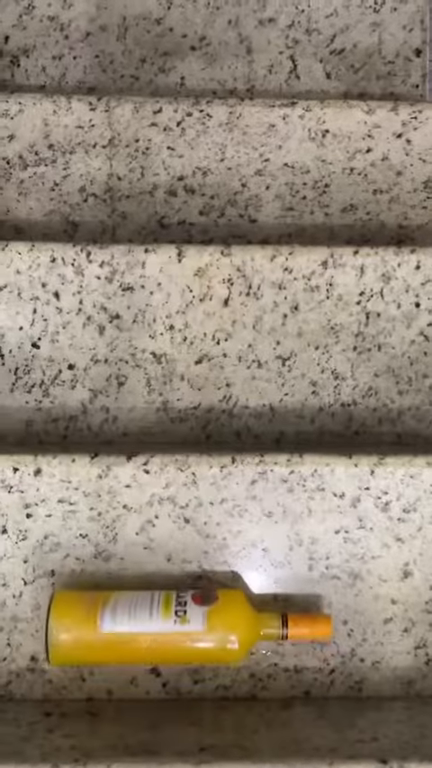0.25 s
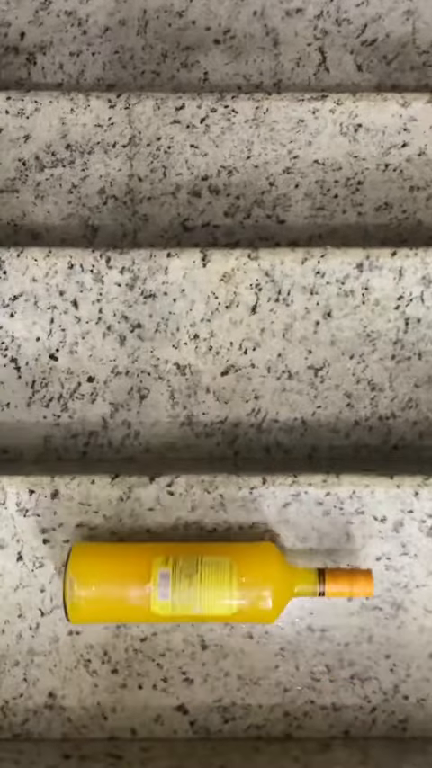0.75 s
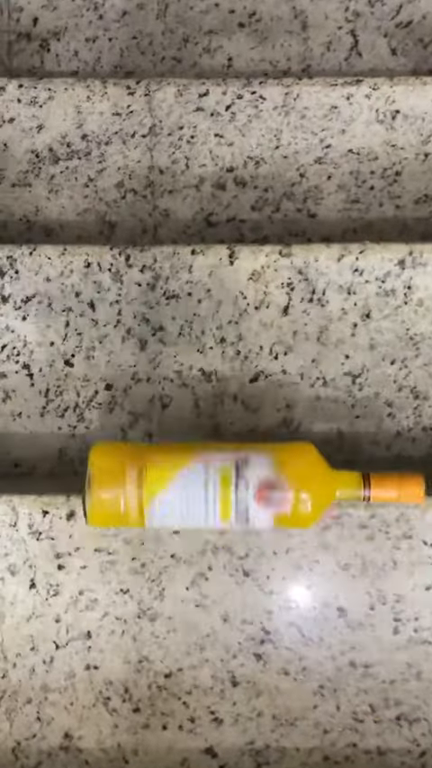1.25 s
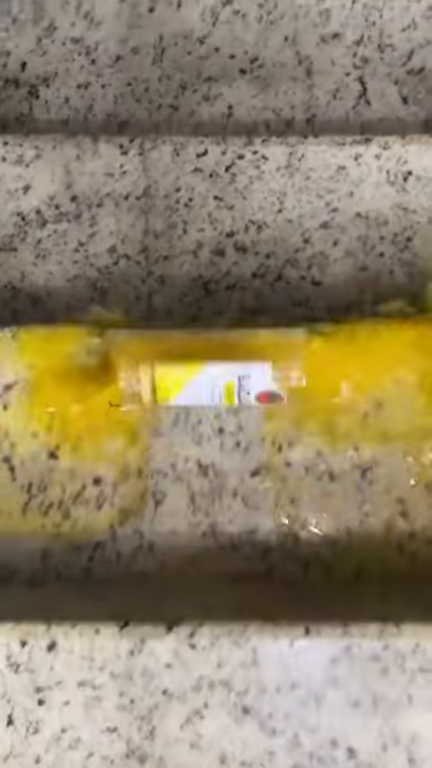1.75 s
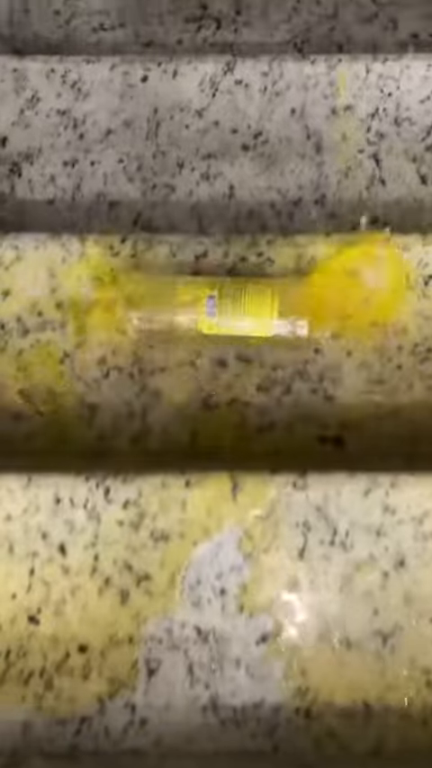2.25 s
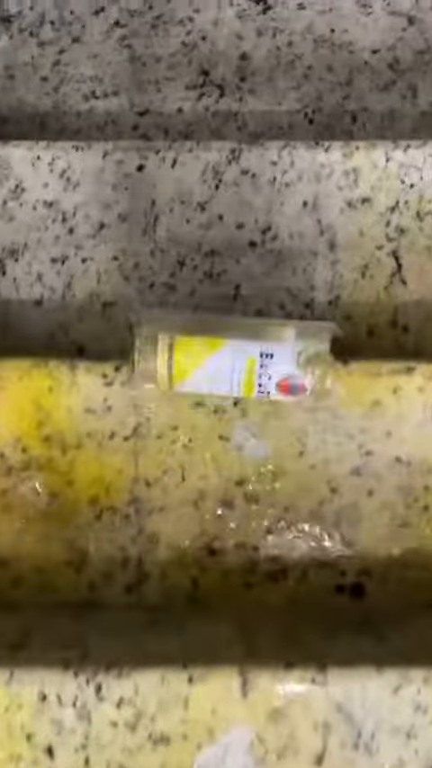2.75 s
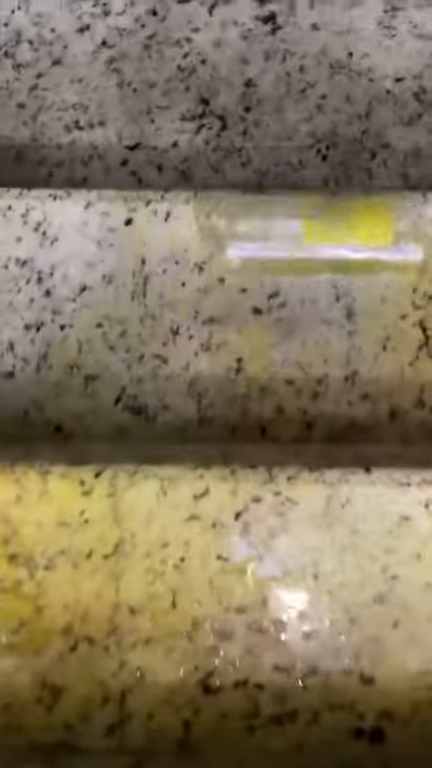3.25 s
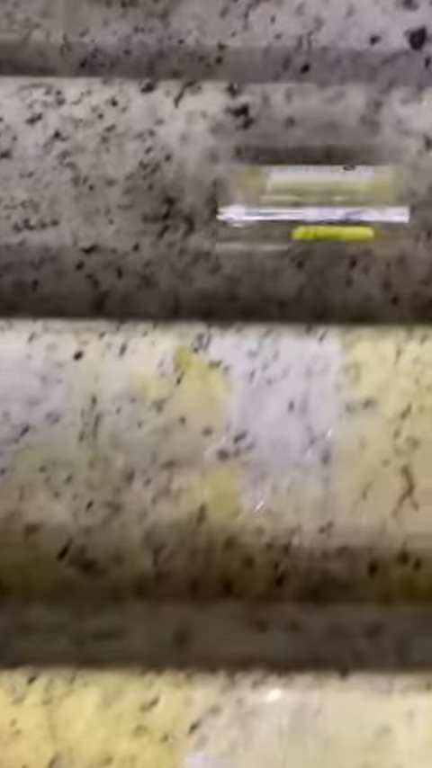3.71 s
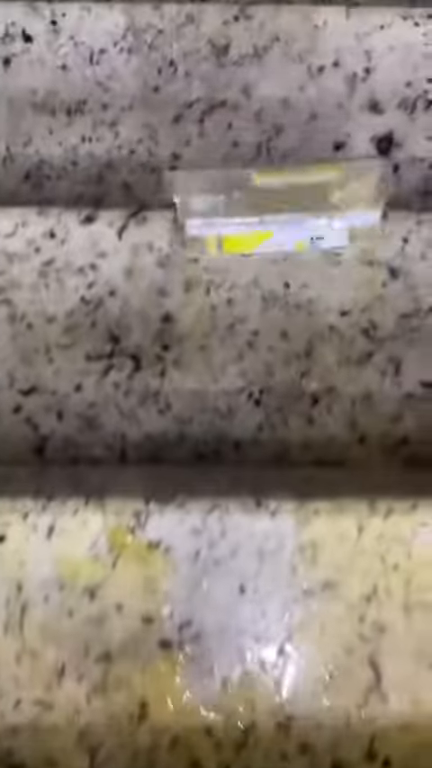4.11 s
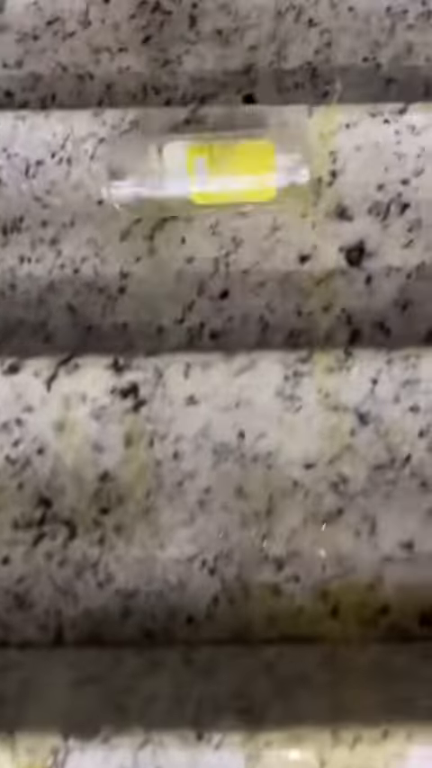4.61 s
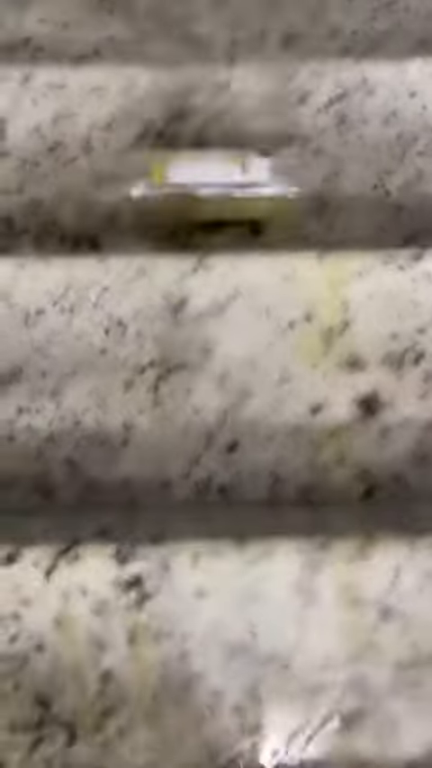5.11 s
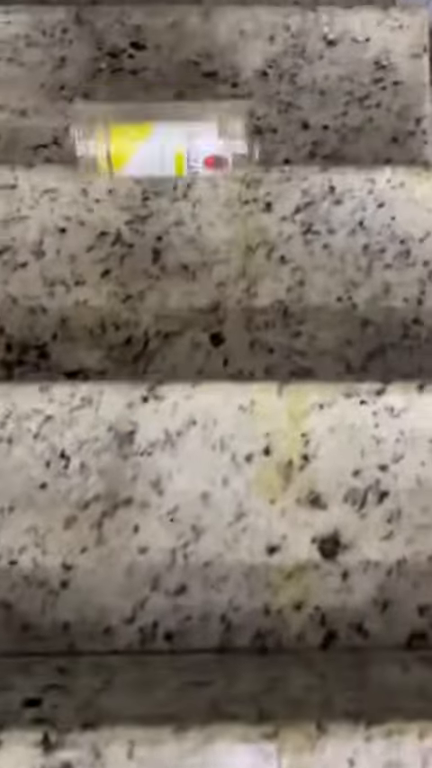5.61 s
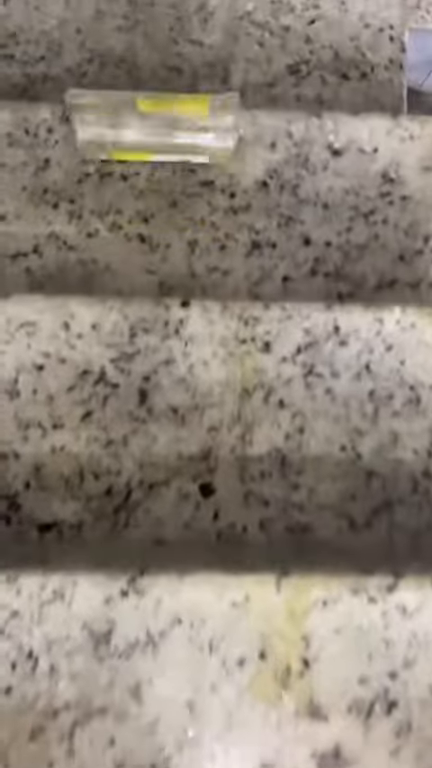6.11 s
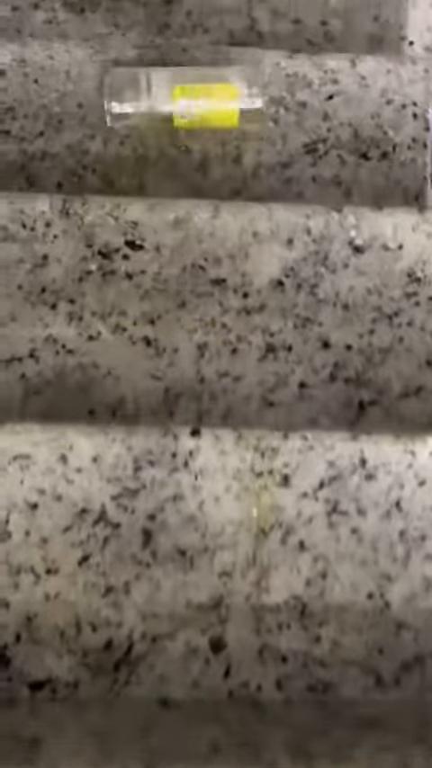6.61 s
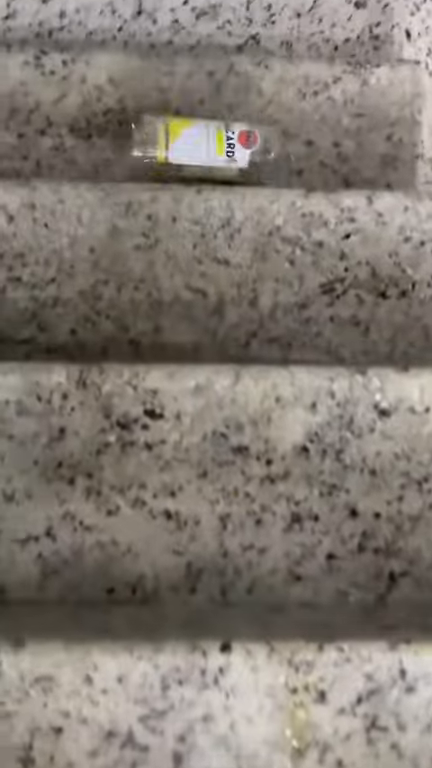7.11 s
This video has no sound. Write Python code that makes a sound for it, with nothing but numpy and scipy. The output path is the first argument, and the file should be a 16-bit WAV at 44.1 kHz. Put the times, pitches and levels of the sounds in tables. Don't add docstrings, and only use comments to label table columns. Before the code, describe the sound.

A full glass bottle rolls softly on stone stairs, bursts with a wet crack and splash, then its hollow shell clacks down step after step, echoing.

```python
import sys
import numpy as np
from scipy import signal
from scipy.fft import rfft, irfft
from scipy.io import wavfile
from scipy.ndimage import uniform_filter1d

SR = 44100
rng = np.random.default_rng(int(sys.argv[2]) if len(sys.argv) > 2 else 0)


def gain_from_decibels(decibels):
    exponent = np.asarray(decibels, float) / 20
    return 10 ** exponent


def unload_wav(signal):
    wavfile.write(
        sys.argv[1],
        SR,
        np.round(np.clip(np.atleast_2d(signal).T, -1, 1) * 32767).astype(np.int16),
    )


N = 324557


def evened(x):
    return x / np.sqrt(np.mean(x ** 2) + 1e-20)


def read(points, hz):
    point_hz, value = np.transpose(points)
    return np.interp(np.log(hz + 1), np.log(point_hz + 1), value)


def add(mix, start_s, sound):
    part = mix[round(start_s * SR):][:len(sound)]
    part += sound[:len(part)]


def coloured(x, points, tilt_db=0.):
    hz = np.fft.rfftfreq(len(x), 1 / SR)
    gain = gain_from_decibels(read(points, hz) + tilt_db * np.log2((hz + 50) / 2000))
    return evened(irfft(rfft(x) * gain, len(x)))


def resonate(x, hz, width_hz):
    turn = np.exp(2j * np.pi * np.cumsum(hz * np.ones(len(x))) / SR)
    r = np.exp(-np.pi * width_hz / SR)
    return 2 * (turn * signal.lfilter([1 - r], [1, -r], x / turn)).real


def drone(hz, width_hz, size=N):
    x = rng.standard_normal(size)
    for _ in range(2):
        x = resonate(x, hz, width_hz)
    return evened(x / np.sqrt(uniform_filter1d(evened(x) ** 2, size=3000) + 0.11))


def ring(hz, t60_s, rise_s=0.00045):
    t = np.arange(SR // 4) / SR
    return gain_from_decibels(-60 * t / t60_s) * (1 - np.exp(-t / rise_s)) * np.sin(2 * np.pi * hz * t)


# pitch_hz, level_db
STILL_AIR = [(76, -42.5), (130, -13.5), (178, -4.5), (308, -14.5), (428, -10.5), (665, -21), (1600, -21),
             (1820, -25), (7340, -34), (10400, -46.5), (13500, -85), (22000, -120)]
AIR_DB, AIR_DRIFT_DB_PER_S = -68, -0.57
AIR_EARLY_DB, AIR_SETTLES_S = 7, 0.38
# start_s, end_s, pitch_hz, level_db
LINGERING_TONES = [(1.22, 2.15, 172, -47), (1.22, 2.0, 228, -58), (.41, .56, 462, -58),
                   (.93, 1.0, 365, -55), (0, .15, 1393, -62), (0, .19, 1720, -64), (.2, .9, 100, -56),
                   (.05, .38, 55, -57), (3.45, 3.75, 460, -55), (.8, 1.2, 760, -65)]
# start_s, boom_db, swell_db, swell_lag_s, swell_hz
THUDS_IN_FLIGHT = [
    (1.22, -56.5, -40.5, 0.34, 73),
    (1.84, -35, -55, .2, 65),
    (2.75, -39.5, -40, 0.28, 70),
    (3.44, -34.5, -42.5, 0.23, 62),
    (4.15, -41.5, -52, 0.31, 55),
    (4.89, -43, -54.5, 0.28, 55),
    (5.58, -39.5, -50, 0.28, 55),
    (6.23, -41.5, -50, 0.29, 55),
    (6.94, -40, -50, 0.27, 55),
]
BOOM_RISE_S, BOOM_T60_S, SWELL_S = .05, 0.94, 0.11
DEEP_REST_DB, UPPER_REST_DB, SUB_DB = -58.5, -66, -64


def building():
    t = np.arange(N) / SR
    deep, upper = gain_from_decibels(DEEP_REST_DB), gain_from_decibels(UPPER_REST_DB)
    for s, boom_db, swell_db, lag_s, _ in THUDS_IN_FLIGHT:
        since = np.maximum(t - s, 0)
        upper = upper + gain_from_decibels(boom_db - 60 * since / BOOM_T60_S) * (1 - np.exp(-since / BOOM_RISE_S))
        deep = deep + gain_from_decibels(swell_db) * np.exp(-.5 * ((t - s - lag_s) / SWELL_S) ** 2)
    swell_s = [row[0] + row[3] for row in THUDS_IN_FLIGHT]
    deep_hz = np.interp(t, swell_s, [row[4] for row in THUDS_IN_FLIGHT])
    out = deep * drone(deep_hz, 23) + upper * drone(108.2, 30) + gain_from_decibels(SUB_DB) * drone(38, 15)

    still = coloured(rng.standard_normal(N), STILL_AIR)
    early = coloured(rng.standard_normal(N), STILL_AIR, tilt_db=1.5)
    air = gain_from_decibels(AIR_DRIFT_DB_PER_S * t) * still + gain_from_decibels(AIR_EARLY_DB) * np.exp(-t / AIR_SETTLES_S) * early
    out += gain_from_decibels(AIR_DB + 7) * air

    for start, end, hz, db in LINGERING_TONES:
        size = round((end - start) * SR)
        tone = drone(hz, 8.3, size=SR)[:size]
        add(out, start, gain_from_decibels(db) * tone * signal.windows.tukey(size, .5))
    return out


# pitch_hz, t60_s
ECHO_DECAY = [(100, 0.46), (260, 1.37), (700, 0.98), (1840, 1.09), (4850, 0.99), (9000, 0.86)]


def stairwell(count):
    hz, t, z = signal.stft(rng.standard_normal((count, SR * 3 // 2)), SR, nperseg=256)
    decay = gain_from_decibels(-60 * t / read(ECHO_DECAY, hz)[:, None]) + 1.57 * gain_from_decibels(-60 * t / 0.22)
    tails = signal.istft(z * decay, SR, nperseg=256)[1]
    tails *= np.clip((np.arange(tails.shape[1]) / SR - .004) / 0.004, 0, 1)
    return tails / np.linalg.norm(tails, axis=1, keepdims=True)


# pitch_hz, level_db
SPLASH_SPECTRUM = [(120, -11), (200, -2.5), (407, -13.5), (480, 0.5), (726, -14.5), (2770, -1), (4400, -2),
                   (6770, -3.5), (8960, -10.5), (10400, -23.5), (13500, -58), (22000, -120)]
# fullest_s, level_db, rise_db_per_s, fall_db_per_s
DRINK_FLOWS = [
    (1.559, -35, 64.5, 26.5),
    (2.499, -42.5, 116, 35),
    (2.73, -34, 121, 57),
    (3.05, -48, 38, -16),
]
FLOW_ENDS_S = 3.45
# start_s, end_s, level_db
ROLLING_GRIT = [
    (3.882, 4.14, -53.5),
    (4.747, 4.9, -58),
    (5.985, 6.117, -50.5),
    (6.102, 6.22, -55.5),
    (6.828, 6.934, -48),
]


def splash():
    t = np.arange(N) / SR
    drop_size = gain_from_decibels(6.9 * np.minimum(rng.exponential(1, N), 5))
    drops = rng.standard_normal(N) * drop_size * (rng.random(N) < 2500 / SR)
    hiss = 0.12 * evened(drops) + rng.standard_normal(N)
    level = sum(gain_from_decibels(db - np.maximum(rise * (s - t), fall * (t - s))) for s, db, rise, fall in DRINK_FLOWS)
    level = level * (t > BURST_HITS[0][0]) * np.clip((FLOW_ENDS_S - t) / 0.048, 0, 1)
    for start, end, db in ROLLING_GRIT:
        level = level + gain_from_decibels(db) * np.clip((t - start) / 0.031, 0, 1) * (t < end)
    return coloured(hiss, SPLASH_SPECTRUM) * level


# pitch_hz, level_db
GLASS_ON_STONE = [(88, -75), (150, -23), (234, -18), (548, -8.5), (727, -18), (1110, -10.5), (1400, -15),
                  (1860, -7.5), (4440, -6.5), (9190, -13.5), (10400, -36), (13500, -69.5), (22000, -120)]


def crack(noise, spectrum, tilt_db, t60_s):
    t = np.arange(len(noise)) / SR
    chatter = gain_from_decibels(2.4 * evened(uniform_filter1d(noise[::-1], size=30)))
    fade = gain_from_decibels(-60 * t / t60_s) * (1 - np.exp(-t / 0.001))
    near = coloured(noise, spectrum, tilt_db) * chatter * fade
    click = signal.unit_impulse(len(t), idx=128)
    far = coloured(click, spectrum, tilt_db) * gain_from_decibels(-60 * t / .05)
    return np.array([near, evened(far) * near.std()])


# start_s, end_s, level_db
BOTTLE_SCUFFS = [
    (0.0, 0.296, -63),
    (0.387, .55, -59.5),
    (0.804, .92, -58),
    (.93, 1.165, -57),
]


def scuff():
    out = np.zeros(N)
    lumps = gain_from_decibels(2.9 * evened(uniform_filter1d(rng.standard_normal(N), size=900)))
    rub = coloured(rng.standard_normal(N), GLASS_ON_STONE, tilt_db=-8.5) * lumps
    for start, end, db in BOTTLE_SCUFFS:
        size = round((end - start) * SR)
        add(out, start, gain_from_decibels(db) * rub[round(start * SR):][:size] * signal.windows.tukey(size, .4))
    return out


# start_s, peak_db, low_hz, high_hz
SOFT_KNOCKS = [
    (0.101, -42, 333, 1820),
    (0.412, -36, 433, 902),
    (0.485, -54, 474, 850),
    (0.824, -38, 370, 900),
    (0.848, -40.5, 340, 1090),
    (0.941, -24.5, 365, 1263),
    (1.039, -38, 310, 1440),
]


def knock(noise, low_hz, high_hz):
    modes = ring(low_hz, .06, rise_s=.005) + 1.5 * ring(high_hz, .014, rise_s=.0025)
    near, far = modes + .5 * crack(noise, GLASS_ON_STONE, -12, .03)
    return near, far


# pitch_hz, level_db
CHIP_SPECTRUM = [(350, -75), (600, -44), (1300, -16.5), (4510, -3), (5790, -7.5), (7100, -11.5),
                 (8590, -23.5), (10400, -40), (13500, -76.5), (22000, -120)]
# start_s, peak_db, ring_hz, tilt_db_per_octave, echo_db
CHIP_TICKS = [(1.5549, -14, 5360, 0, -12), (1.5718, -23.5, 5740, -11.5, 2), (1.642, -24, 5800, -7, -17),
              (1.699, -23, 7730, 35, -11.5), (2.157, -6.5, 4980, 5, -7), (2.1848, -15, 6440, -1, -5.5),
              (2.21, -46, 6200, 16, -1), (2.277, -25.5, 5130, -14, -6.5), (2.2879, -26, 6850, -10, -10.5),
              (2.397, -23.5, 3930, -4, -10.5), (3.775, -29, 5460, 26.5, -7)]


def chip(noise, ring_hz, tilt_db):
    return crack(noise, CHIP_SPECTRUM, tilt_db, 0.024) + np.outer([.4, .1], ring(ring_hz, 0.028))


# pitch_hz, level_db
BURST_SPECTRUM = [(88, -32), (150, -19), (435, -20), (654, -12.5), (1000, -12.5), (1310, -6), (5300, -4),
                  (6790, -11), (8870, -13), (10400, -34.5), (13500, -73), (22000, -120)]
# start_s, peak_db, wall_hz, tilt_db_per_octave, echo_db
BURST_HITS = [
    (1.212, -10, 3060, -3.5, 5),
    (1.215, -2.5, 3050, 1, -32),
    (1.223, -3.5, 3260, -2.5, -15.5),
    (1.239, -19, 4200, 1, 11.5),
    (1.251, -20.5, 3520, -24.5, 11),
    (1.832, -14, 6000, -2, 9.5),
    (1.839, -5, 2720, 6, -2),
    (1.846, -6, 5760, -3.5, -4),
    (1.858, -16, 5030, 5, 2),
    (1.902, -16.5, 2790, -3, 1.5),
]


def burst(noise, wall_hz, tilt_db):
    return crack(noise, BURST_SPECTRUM, tilt_db, 0.016) + np.outer([1.5, .5], ring(wall_hz, 0.014))


def hollow(x, air_hz):
    back = np.zeros(round(SR / air_hz) + 5)
    back[0] = 1
    back[-10:] = -.45 / 10
    return signal.lfilter([1], back, x)


WET_HZ, DRY_HZ, DRAINS_S = 682, 810, (2.9, 4.8)
FOLLOW_HZ, FOLLOW_S = 734, .137


def with_air_pitch(drops):
    s = np.transpose(drops)[0]
    first_end = np.diff(s, prepend=0) > FOLLOW_S
    hz = np.where(first_end, np.interp(s, DRAINS_S, (WET_HZ, DRY_HZ)), FOLLOW_HZ)
    return [(*row[:-1], air_hz, row[-1]) for row, air_hz in zip(drops, hz)]


# start_s, peak_db, wall_hz, air_db, echo_db
TUBE_DROPS = [(2.732, -5.5, 1345, -21, -10.5), (2.757, -4, 2620, -5, -6), (2.901, -14.5, 5280, -13, -6),
              (2.914, -15, 5720, -9, -8.5), (2.954, -19.5, 4980, -2, -4), (3.194, -15.5, 1075, -1, -3.5),
              (3.413, -6, 1420, -6.5, -4.5), (3.434, -3, 1364, 0.5, -6), (3.446, -9, 2720, 10, 0.5),
              (3.524, -19, 1290, -9, -1.5), (4.142, -3, 2666, -3, -6), (4.153, -5.5, 1500, -5, -1),
              (4.886, -8.5, 2638, -7.5, 1), (4.894, -5, 4530, 1.5, -5), (5.58, -4.5, 1696, -4, -8),
              (5.587, -11.5, 2660, -1, 4.5), (6.227, -4.5, 5520, -7.5, -4), (6.235, -8.5, 2720, 0.5, 0.5),
              (6.368, -18, 2300, 4, -21), (6.927, -7.5, 5880, -6.5, 0.5), (6.944, -5.5, 2850, -4, -6)]
# multiple, level_db, t60_s
TUBE_AIR = [(1, -1, 0.039), (1.092, -2, 0.02)]
# pitch_hz, level_db, t60_s
TUBE_WALL_MODES = [(1135, -20, 0.023), (1398, -18.5, 0.075), (1994, -25.5, 0.016), (2720, -13.5, 0.053),
                   (4466, -16, 0.0053), (5720, -13.5, 0.036)]


def landing(noise, wall_hz, air_db, air_hz):
    knocking = hollow(crack(noise, GLASS_ON_STONE, 0, 0.035), air_hz)
    nearest = ring(wall_hz, 0.021)
    walls = sum(gain_from_decibels(db + 4.5 * np.tanh(luck)) * ring(hz * (1 + .02 * np.tanh(bend)), t60)
                for (hz, db, t60), luck, bend in zip(TUBE_WALL_MODES, noise, noise[::-1]))
    air = gain_from_decibels(air_db) * sum(gain_from_decibels(db) * ring(air_hz * k, t60, rise_s=0.0029) for k, db, t60 in TUBE_AIR)
    modes = np.outer([.8, .3], nearest) + np.outer([.7, .8], walls) + np.outer([1.2, .6], air)
    return 0.66 * knocking + modes


# start_s, level_db, pitch_hz, t60_s, echo_db
RINGING_PIECES = [(1.2145, -7, 3150, .045, -20), (1.832, -12, 6170, .03, -5), (2.160, -13, 6266, .025, -1),
                  (2.166, -17, 6266, .15, -3), (2.902, -16, 5750, .014, 1), (2.918, -18, 6080, .02, 2),
                  (1.846, -22, 655, .08, 1.5), (2.732, -14, 1150, .03, -2), (3.195, -24, 960, .03, 1.5),
                  (1.2262, -15, 160, .045, -12), (1.225, -22, 115, .1, -8), (1.2265, -24, 300, .03, -8),
                  (1.84, -30, 120, .1, -4), (2.74, -30, 120, .1, -4), (4.87, -36, 58, .15, -10),
                  (3.195, -32, 350, .05, 0)]


def glass():
    heard = []
    sources = ((burst, BURST_HITS), (landing, with_air_pitch(TUBE_DROPS)), (chip, CHIP_TICKS))
    for source, rows in sources:
        for s, db, *colour, echo_db in rows:
            near, far = source(rng.standard_normal(SR // 4), *colour)
            gain = gain_from_decibels(db) / abs(near).max()
            heard.append((s, gain * near, gain * gain_from_decibels(echo_db + 4.5) * far))
    for s, db, hz, t60, echo_db in RINGING_PIECES:
        tone = gain_from_decibels(db) * ring(hz, t60)
        heard.append((s, tone, gain_from_decibels(echo_db) * tone))
    for s, db, low_hz, high_hz in SOFT_KNOCKS:
        near, far = knock(rng.standard_normal(SR // 4), low_hz, high_hz)
        heard.append((s, gain_from_decibels(db - 4) * near, gain_from_decibels(db - 8) * far))

    dry, sends = np.zeros(N), np.zeros((4, N))
    for k, (s, near, far) in enumerate(heard):
        add(dry, s, near)
        add(sends[k % 4], s, far)
    echoes = signal.oaconvolve(sends, stairwell(count=4), axes=1)[:, :N]
    return dry + echoes.sum(0)


def scene():
    return (building() + splash() + scuff() + glass())[None]


def band_limit(x):
    return signal.sosfilt(signal.butter(12, 10740, fs=SR, output="sos"), x)


def record(dry):
    edge_hz, thin_tone_hz, gap_ends_s = 10750, 7752, 6.22
    hz, t, z = signal.stft(dry, SR, nperseg=512)
    power = uniform_filter1d(abs(z) ** 2, size=3)
    smear = np.sqrt(abs(uniform_filter1d(power, size=9, axis=1)))
    z = z + gain_from_decibels(-14) * smear * np.exp(2j * np.pi * rng.random(z.shape))

    top = np.sqrt((abs(z[:, (hz > 8000) & (hz < 9500)]) ** 2).mean(1))
    slope = np.gradient(np.log(top + 1e-9), axis=1)
    falling = uniform_filter1d(slope, size=9) < .015
    gap_open = uniform_filter1d(falling * 1., size=3)[:, None] * (t < gap_ends_s)
    gap = np.exp(-((hz - 7350) / 300) ** 4)[:, None] * gap_open
    patches = uniform_filter1d(rng.standard_normal(z.shape), size=25)
    patches = evened(uniform_filter1d(patches, size=2, axis=1))
    thin_db = np.exp(-((hz - 6800) / 400) ** 4)[:, None] * (3 + 9 * np.maximum(patches, 0))
    edge_db = 70 * np.clip((hz - edge_hz + 800) / 1300, 0, 2)[:, None] ** 2
    z = z * gain_from_decibels(-45 * gap - thin_db - edge_db)

    out = signal.istft(z, SR, nperseg=512)[1][:, :N]
    seconds = np.arange(N) / SR
    out = out + 1.8 * np.interp(seconds, t, top[0]) * np.sin(2 * np.pi * thin_tone_hz * seconds)
    bass_cut = signal.butter(2, 38, "high", fs=SR, output="sos")
    out = signal.sosfilt(bass_cut, out)
    return band_limit(out)


dry = scene()
out = record(dry)
unload_wav(out)
```